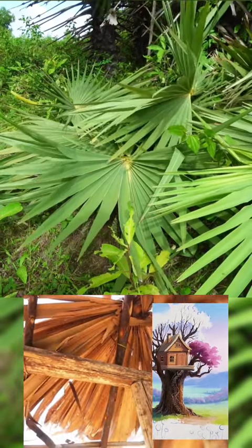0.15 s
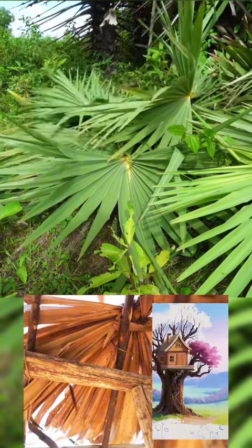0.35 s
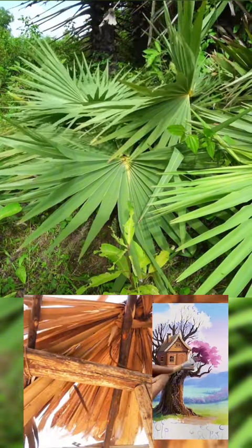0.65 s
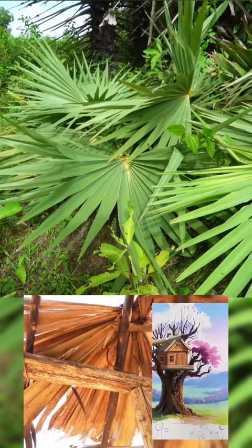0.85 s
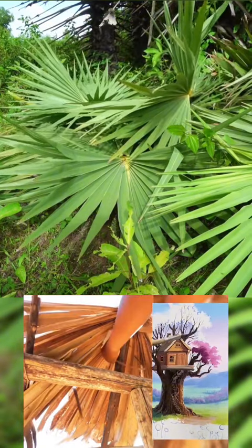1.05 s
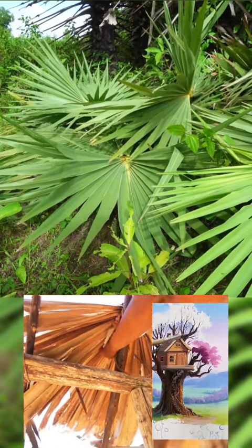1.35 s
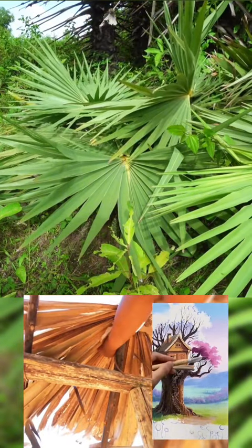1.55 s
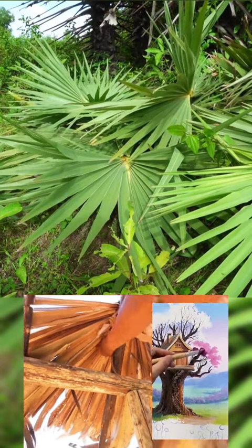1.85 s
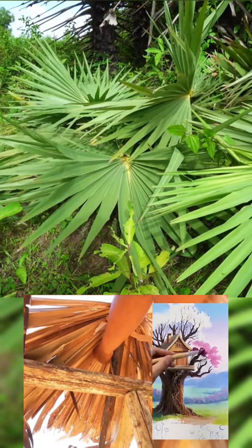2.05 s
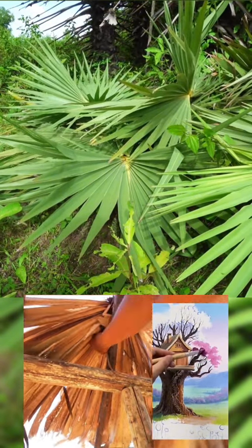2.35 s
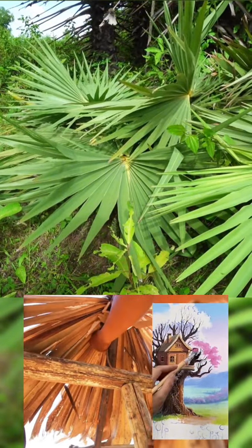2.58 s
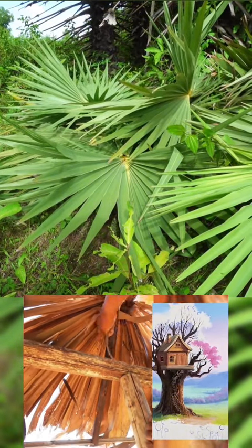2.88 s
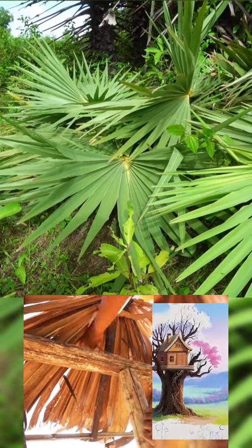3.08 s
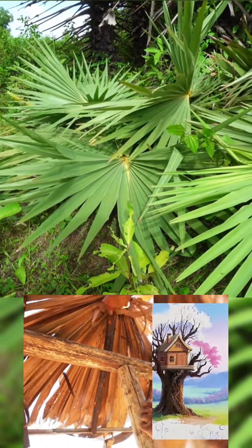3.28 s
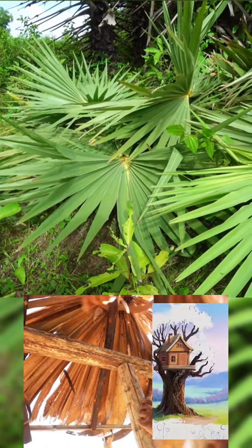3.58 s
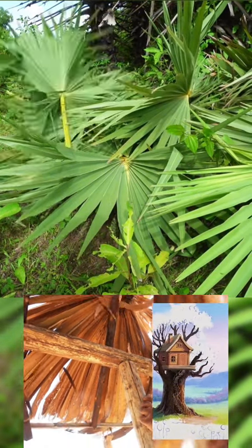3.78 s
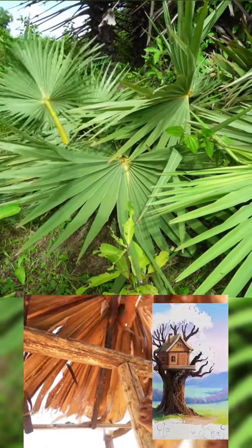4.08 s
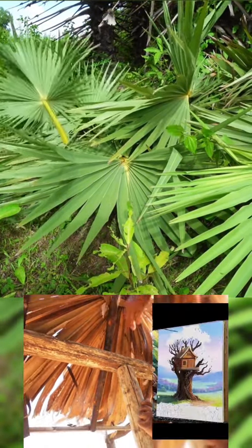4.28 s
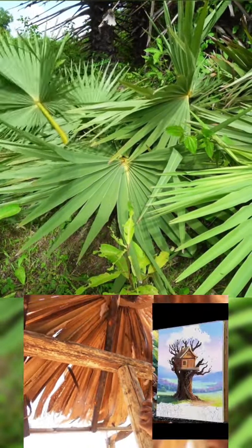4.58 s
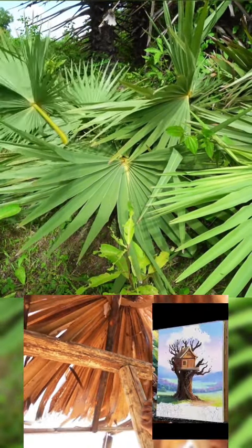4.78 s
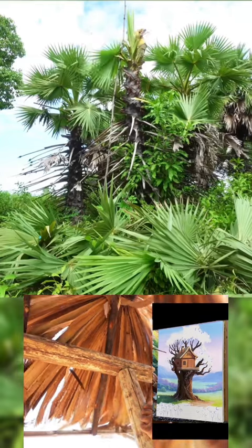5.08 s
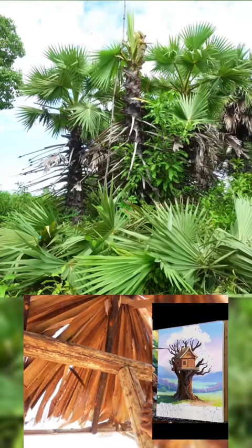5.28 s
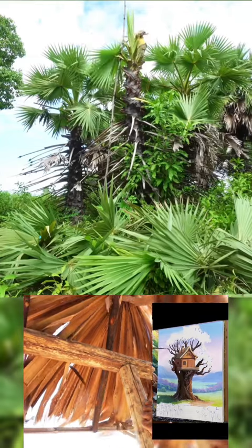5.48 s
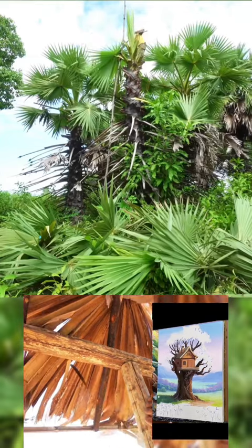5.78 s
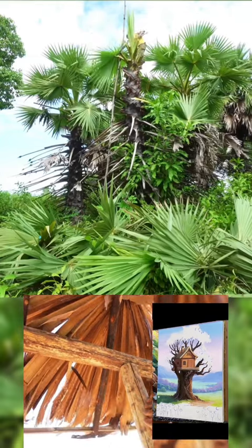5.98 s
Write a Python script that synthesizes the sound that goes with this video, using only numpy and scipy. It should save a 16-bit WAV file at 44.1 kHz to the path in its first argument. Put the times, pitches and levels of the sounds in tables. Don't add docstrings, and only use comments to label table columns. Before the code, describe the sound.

Dry palm fronds are shaken and bundled by hand outdoors, a few steps from a phone, and the sound has been slowed so rustles become grainy streaks and snaps stutter. Two quick dry swishes come at about 0.2 and 0.35 seconds, fading by 0.6. From there to 2 seconds it is nearly quiet: faint settling, tiny ticks, soft low stalk knocks. At 2.15 a sharp snap and rustle begin a busier run, with short brittle strokes at 2.65 and 3.0 and a snap at 3.35. A brighter rustle swells through 3.4, leading to the loudest crack and crunchy rustle at 3.8, trailing off by 4.3. Quiet settling and small ticks follow until repeated snaps with rustling at 5.75 and 6.05. Very faint low air lies beneath; the treble sometimes spreads wide.

```python
import sys
import numpy as np
from scipy import signal
from scipy.fft import rfft, irfft, next_fast_len
from scipy.io import wavfile
from scipy.ndimage import uniform_filter1d

SR = 44100
rng = np.random.default_rng(int(sys.argv[2]) if len(sys.argv) > 2 else 0)


def nominal_scale(level):
    x = np.asarray(level, float) / 20
    return 10 ** x


def master(y):
    cut = np.clip(np.atleast_2d(y).T, -1, 1)
    pcm = np.round(cut * 32767)
    wavfile.write(sys.argv[1], SR, pcm.astype(np.int16))


N = 270333
BLOCK = 2048

# peak t/s, level/dB, rise/s, fall/s, brightness/dB; rise and fall span 20 dB
STROKES = [(0, -54, .02, 0.1, -3), (0.101, -55, .05, 0.092, 10), (.225, -34.5, 0.085, 0.071, -1.5),
           (.355, -27, 0.07, 0.15, -2), (0.599, -52, 0.073, 0.17, -4), (1.13, -49, 0.084, 0.072, -7),
           (1.359, -69, 0.13, 0.45, 8.5), (1.54, -54, 0.055, 0.13, -7), (2.05, -60, 0.057, 0.12, 3.5),
           (2.19, -38.5, 0.28, .13, -2.5), (2.43, -60, 0.072, 0.059, -5.5), (2.52, -68, 0.091, .15, 11),
           (2.634, -33.5, 0.053, .1, -4), (2.869, -61.5, 0.087, 0.067, 8), (2.986, -33, 0.05, 0.13, -2.5),
           (3.131, -41.5, 0.051, 0.55, -4), (3.439, -41.5, 0.67, 0.32, 4), (3.68, -56.5, 0.047, 0.43, 5.5),
           (3.834, -22.5, 0.27, 0.15, -2), (4.0, -41.5, 0.13, 0.34, -10), (4.419, -54.5, 0.3, 0.45, -3),
           (5.19, -64, 0.034, 0.076, 2.5), (5.78, -34.5, 0.1, 0.088, 1), (6.065, -33.5, 0.1, 0.1, 2.5)]
# ring f/Hz, ring level/dB, second ring f/Hz, hollow f/Hz, stalk level/dB
LEAVES = [(1500, 6, 6000, 620, 10), (2450, -7, 6500, 300, 2), (2000, 17.5, 1150, 860, 2),
          (3740, 0.5, 860, 900, 4), (1500, -2, 1500, 690, -2), (2706, 5, 890, 3750, 6),
          (2610, 10.5, 2300, 4000, 17.5), (2460, 9, 2600, 3200, 5.5), (2610, 12, 1980, 1530, 2),
          (3170, 8, 6600, 1100, 8.5), (1280, 4.5, 740, 780, -13), (1850, 0, 4900, 900, 13),
          (1330, 7.5, 1900, 3700, -1.5), (1870, 2.5, 4300, 810, -6), (1030, 9.5, 1700, 3300, 0),
          (1460, 4.5, 3800, 270, 2.5), (5340, 3, 1750, 1000, 0), (3000, 1, 3700, 950, -9.5),
          (2350, 6, 4700, 1500, -7), (2276, 2, 2700, 1650, -1), (1380, 10, 510, 8000, -21),
          (1640, 4.5, 2700, 700, 17), (3420, 4.5, 2700, 1059, 9.5), (1970, 7, 3200, 1150, 10.5)]
# t/s, level/dB, brightness/dB
SETTLE = [(0, -68, 9.5), (.75, -57, -5.5), (.92, -70, -3), (1.02, -63.5, -0.5), (1.25, -70, -2),
          (1.75, -71.5, -4.5), (1.9, -69.5, 1), (2.15, -67.5, 4), (2.8, -63.5, 4), (3.3, -66.5, -2),
          (4.15, -59, 5), (4.57, -65.5, -0.5), (4.61, -62.5, 8.5), (4.85, -58, 1.5), (5.05, -68, 3.5),
          (5.4, -71, 2), (5.7, -73.5, -3), (6.13, -61.5, -12)]
# t/s, peak level/dB, low ring f/Hz, high ring f/Hz
SNAPS = [(0.0917, -43, 1790, 6090), (0.0995, -42, 1510, 5250), (0.925, -50.5, 1800, 8300),
         (1.301, -43, 1605, 5260), (1.869, -51, 2460, 6440), (2.136, -27.5, 1440, 3040),
         (2.4995, -33, 1850, 4570), (2.8607, -33.5, 1870, 4360), (3.3377, -28.5, 1740, 5400),
         (3.7835, -14, 2000, 2900), (4.594, -37.5, 1500, 4000), (5.182, -48, 1200, 3480),
         (5.7252, -24, 1840, 3150), (6.013, -17.5, 1700, 3010)]


def lag(x, count):
    return np.r_[np.zeros(count * BLOCK), x][:N]


def unit(x):
    return x / np.sqrt(np.mean(x ** 2))


def read(table, hz):
    f, db = np.transpose(table)
    return np.interp(np.log(hz + 1), np.log(f), db)


def ring(x, hz, width_hz):
    b, a = signal.iirpeak(hz, hz / width_hz, fs=SR)
    once = signal.lfilter(b, a, x)
    return signal.lfilter(b, a, once)


def walk(rate):
    hold = int(SR / rate)
    steps = np.repeat(rng.standard_normal(N // hold + 1), hold)
    smooth = uniform_filter1d(uniform_filter1d(steps, hold), hold)
    return 1.39 * smooth[:N]


def handling():
    rise_curve, fall_curve, hold_s = 1.21, 0.97, 0.012
    snap_reach_s, lead_in_s = 0.115, 0.0086
    lumpy_db, sag_db = -45, 7
    t = np.arange(0, N / SR + .002, .001)
    s, db, rise, fall, _ = np.transpose(STROKES)[:, :, None]
    wait = s - np.array(SNAPS)[:, 0]
    wait = np.where((wait > 0) & (wait < snap_reach_s), wait, 0).max(axis=1, keepdims=True)
    hold = hold_s * (wait == 0)
    lost_rise = np.maximum((s - hold - t) / rise, 0) ** rise_curve
    lost_fall = np.maximum((t - s - hold) / fall, 0) ** fall_curve
    turns = (t - s + wait) * SR / BLOCK
    sag = np.clip(3 * turns, 0, 1) * (turns < 1) * (db > lumpy_db) * (wait < 1.5 * BLOCK / SR)
    cut_db = 20 * np.maximum((s - wait - t) / lead_in_s, 0) + sag_db * sag
    return t, db - 20 * (lost_rise + lost_fall) - cut_db * (wait > 0)


def streaks(slow, contrast, repeat_db):
    overlap = 3 * BLOCK // 4
    z = signal.stft(rng.standard_normal(N + 2 * BLOCK), nperseg=BLOCK, noverlap=overlap)[2]
    at = np.arange(z.shape[1] - 1) / max(slow, 1)
    k = at.astype(int)
    size = (1 + k - at) * abs(z[:, k]) + (at - k) * abs(z[:, k + 1])
    phase = np.cumsum(np.angle(z[:, k + 1]) - np.angle(z[:, k]), axis=1)
    slowed = size ** contrast * np.exp(1j * phase)
    x = signal.istft(slowed, nperseg=BLOCK, noverlap=overlap)[1][:N]
    return unit(x + nominal_scale(repeat_db) * lag(x, count=1))


def mottle(x, depth_db, size, count):
    z = signal.stft(x, nperseg=size)[2]
    patch = rng.standard_normal(z.shape)
    for axis in (0, 1, 0, 1):
        patch = uniform_filter1d(patch, size=count, axis=axis)
    patchy = z * nominal_scale(depth_db * unit(patch))
    return unit(signal.istft(patchy, nperseg=size)[1][:len(x)])


def swells(bed, contrast):
    swell_s, loop_share, second_share = 0.16, 0.57, 0.57
    ring_q, hollow_level_db = 4.5, -9
    out, t = bed.copy(), np.arange(N) / SR
    blocks = rng.standard_normal((len(STROKES), BLOCK))
    for stroke, leaf, block in zip(STROKES, LEAVES, blocks):
        s, stroke_db = stroke[:2]
        ring_hz, ring_db, second_hz, hollow_hz, _ = leaf
        near = slice(max(int((s - swell_s) * SR), 0), int((s + swell_s) * SR))
        bell = np.cos(np.pi * np.clip((t[near] - s) / swell_s, -.5, .5)) ** 1.2
        above_db = stroke_db - np.interp(s, *np.transpose(SETTLE)[:2])
        share = np.clip(loop_share * above_db / 18, .3, .9)
        z = rfft(mottle(block, depth_db=3.4, size=256, count=3))
        loop = np.resize(unit(irfft(z * abs(z) ** (contrast - 1))), len(bell))
        both = np.sqrt(1 - share * bell) * out[near] + np.sqrt(share * bell) * loop
        f = np.fft.rfftfreq(len(both), 1 / SR)
        rings = (ring_hz, ring_db), (second_hz, second_share * ring_db), (hollow_hz, hollow_level_db)
        colour_db = sum(db * np.exp(-((f / hz - 1) * ring_q / .55) ** 2) for hz, db in rings)
        coloured = irfft(rfft(both) * nominal_scale(colour_db), len(both))
        out[near] = both + bell * (coloured - both)
    return out


def fronds(carrier, sway_db, flicker_db):
    control_hz = (380, 600, 2000, 3800, 6400, 12500)
    # f/Hz, level/dB per Hz
    frond_spectrum = [(150, -76.5), (250, -31.5), (597, -11), (890, -10), (1260, -5), (1420, -5),
                      (1850, -3), (3980, -4.5), (4340, -5.5), (6140, -6.5), (6700, -9), (7570, -8.5),
                      (15200, -14), (16000, -15)]
    settle_tilt_db = (17.5, 9.5, -0.5, -2.5, -1, -0.5)
    bright_share = (0, 0, 0.15, 0.61, 0.94, 1.1)
    t, stroke_db = handling()
    tilts = np.outer(np.array(STROKES)[:, 4], bright_share)
    tilts[:, :2] = np.add.outer(np.array(LEAVES)[:, 4], (-3, 0))
    power = nominal_scale(tilts.T) ** 2 @ nominal_scale(stroke_db) ** 2
    s, db, bright_db = np.transpose(SETTLE)
    settle_db = np.add.outer(settle_tilt_db, np.interp(t, s, db))
    settle_db = settle_db + np.outer(bright_share, np.interp(t, s, bright_db))
    power += nominal_scale(settle_db) ** 2
    size = next_fast_len(N)
    f = np.fft.rfftfreq(size, 1 / SR)
    z = rfft(carrier, size) * nominal_scale(read(frond_spectrum, f))
    z *= size / np.sqrt(2 * size * np.mean(abs(z) ** 2 * (f > 1000) * (f < 4000)) / 2)
    out, sway = 0, walk(2.7)
    for step in range(19):
        hz = 250 * 2 ** (step / 3)
        band = np.cos(np.pi / 2 * np.clip(3 * np.log2((f + 1) / hz), -1, 1)) ** 2
        weights = [np.interp(np.log(hz), np.log(control_hz), row) for row in np.eye(len(control_hz))]
        sway = unit(1.7 * sway + 0.29 * walk(5.263))
        band_db = np.interp(np.arange(N) / SR, t, weights @ (10 * np.log10(power)))
        band_db = band_db + sway_db * sway + flicker_db * walk(18)
        out = out + nominal_scale(band_db) * irfft(z * band, size)[:N]
    return out


def widen(mid, fill):
    # from t/s, to t/s, low f/Hz, first ceiling f/Hz, climb of the ceiling/Hz per s
    spells = [
        (0, .93, 4740, 9500, 11000),
        (.93, 2.13, 800, 4500, 17000),
        (2.88, 3.34, 6260, 11700, 0),
        (3.7, 4.6, 4680, -3000, 42000),
        (5.27, 5.72, 2200, 7000, 60000),
        (0, 3.3, 300, 750, 0),
        (5.72, 5.97, 500, 1300, 0),
        (0, .1, 8500, 15800, 0),
        (5.72, 5.9, 4100, 5600, 0),
    ]
    # f/Hz, side level against mid/dB
    apart = [(700, -10.5), (2200, -8), (2500, -7), (6000, -3.5), (8000, -3), (13000, -1)]
    f, t, z = signal.stft(mid, SR, nperseg=BLOCK // 2)
    pitch, gate = f[:, None], 0
    for start, end, low_hz, top_hz, climb in spells:
        ceiling = np.maximum(top_hz + climb * (t - start), 6300 * (climb > 0))
        inside = (pitch > low_hz) & (pitch < ceiling) & (t > start) & (t < end)
        gate = gate + inside.astype(int)
    gate = gate * nominal_scale(read(apart, f))[:, None]
    chosen = rng.random((len(f) // 8 + 1, len(t) // 4 + 1)) < fill
    strips = np.kron(chosen, np.ones((8, 4)))[:len(f), :len(t)]
    size = uniform_filter1d(abs(z), size=9, axis=0)
    fresh = signal.stft(rng.standard_normal(N), nperseg=BLOCK // 2)[2]
    fresh = fresh / np.sqrt(np.mean(abs(fresh) ** 2))
    return signal.istft(fresh * size * gate * strips, SR, nperseg=BLOCK // 2)[1][:N]


def field():
    # f/Hz, level/dB per Hz
    air_spectrum = [(15, -36), (25, -15.5), (145, 4), (194, 2.5), (330, 2.5), (430, -23.5), (730, -120)]
    size = next_fast_len(N)
    z = rfft(rng.standard_normal((2, size))) * nominal_scale(read(air_spectrum, np.fft.rfftfreq(size, 1 / SR)))
    mid, side = unit(irfft(z, size)[:, :N]) * nominal_scale(-87.5 + 2 * walk(14))
    return np.array([mid + 0.75 * side, mid - 0.75 * side])


def snaps():
    # repeat level/dB, length/ms
    repeats = [(-9, 6), (-9, 6), (-9, 6), (-12, 3), (-12, 4), (3, 6), (-2.5, 3), (-10, 2.5), (-9, 6),
               (6, 4), (-12, 11), (-8, 5), (8, 8), (5, 3)]
    out, n = np.zeros(N + 4 * BLOCK), np.arange(BLOCK)
    noises = rng.standard_normal((len(SNAPS), BLOCK))
    for (s, db, low_hz, high_hz), (repeat_db, ms), noise in zip(SNAPS, repeats, noises):
        age = n / SR / (ms / 1000)
        burst = noise * (1 - np.exp(-age / 0.48)) * np.exp(-age / 1.1)
        crack = signal.lfilter(*signal.butter(1, (1200, 10000), "band", fs=SR), burst)
        ring_db = np.clip(.6 * (db + 52), 0, 14)
        low = nominal_scale(ring_db - 11.5) * unit(ring(burst, low_hz, 520))
        high = nominal_scale(ring_db - 11) * unit(ring(burst, high_hz, 880))
        snap = low + high + unit(crack)
        snap *= nominal_scale(db - 1.5) / abs(snap).max()
        last_db = repeat_db + min(repeat_db, 0) - 14
        for turn, turn_db in enumerate((0, repeat_db, last_db)):
            i = int(s * SR) + turn * BLOCK
            out[i:i + BLOCK] += nominal_scale(turn_db) * snap
    return out[:N]


def stalks(carrier):
    # t/s, level/dB, length/s, ring f/Hz
    knocks = [(0.623, -58, 0.16, 598), (0.848, -55.5, 0.1, 554), (1.0, -66.5, 0.079, 570),
              (1.26, -72.5, 0.16, 585), (1.83, -66, 0.098, 618), (2.352, -63, 0.065, 624),
              (3.864, -43.5, .06, 690), (4.32, -64, .06, 594), (4.886, -64, 0.044, 624),
              (5.454, -81, 0.27, 496), (5.756, -45.5, 0.04, 587)]
    t, out = np.arange(N) / SR, 0
    for s, db, length, hz in knocks:
        tone = unit(ring(carrier, hz, hz / 4.5))
        out = out + tone * nominal_scale(db - 20 * ((t - s) / length) ** 2)
    return out


def scene():
    bed = streaks(slow=2.5, contrast=1.3, repeat_db=-11)
    bed = mottle(bed, depth_db=1.9, size=1024, count=5)
    bed = swells(bed, contrast=0.7)
    mid = fronds(bed, sway_db=.6, flicker_db=1.2) + snaps() + stalks(rng.standard_normal(N))
    mid = signal.sosfilt(signal.butter(6, 400, "high", fs=SR, output="sos"), mid)
    mid = signal.sosfilt(signal.ellip(8, .2, 60, 15800, fs=SR, output="sos"), mid)
    side = widen(mid, fill=.75)
    return np.array([mid + side, mid - side]) + field()


def band_limit(x):
    return signal.sosfilt(signal.butter(12, 16610, fs=SR, output="sos"), x)


def record(dry):
    return band_limit(dry)


dry = scene()
out = record(dry)
master(out)
```